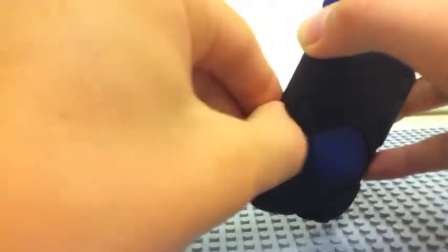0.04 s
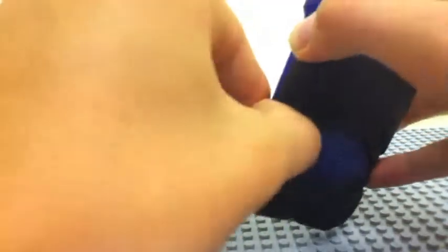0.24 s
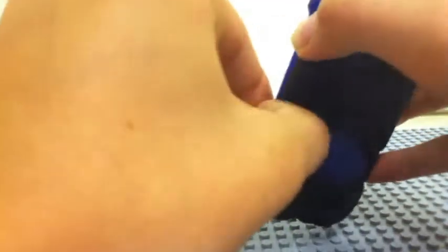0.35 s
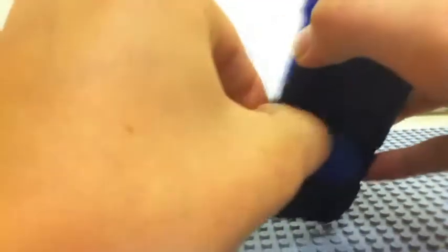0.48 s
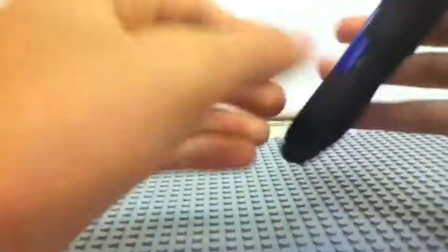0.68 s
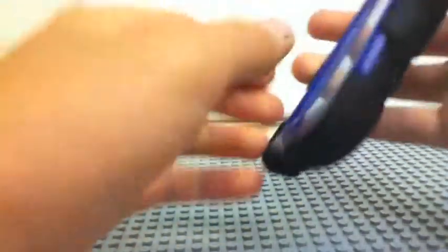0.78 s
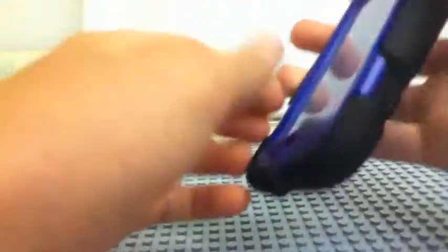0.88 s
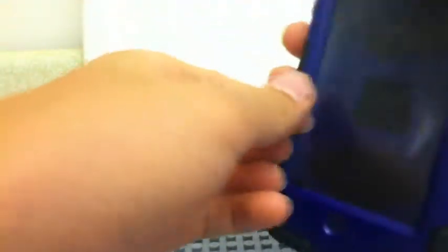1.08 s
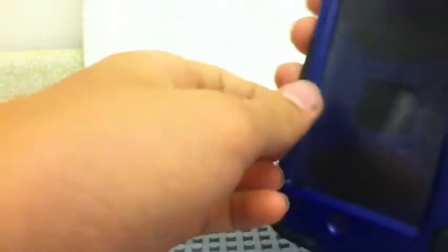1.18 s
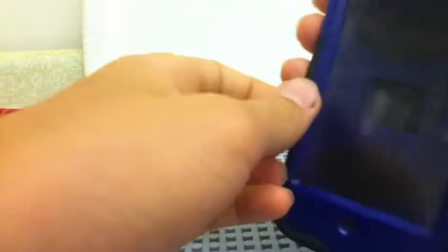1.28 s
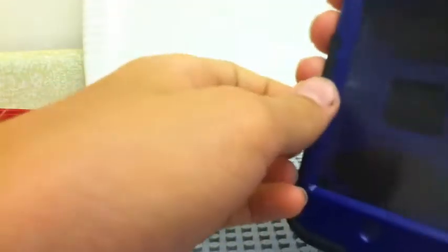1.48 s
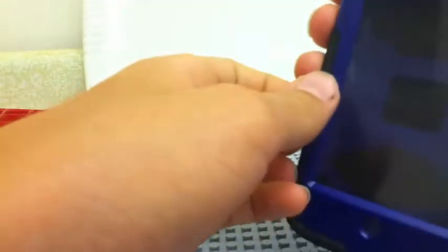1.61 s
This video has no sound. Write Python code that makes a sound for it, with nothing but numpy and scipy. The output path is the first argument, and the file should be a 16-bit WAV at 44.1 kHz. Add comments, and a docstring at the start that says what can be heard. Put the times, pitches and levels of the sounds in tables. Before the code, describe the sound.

Plastic phone case clips snap under prying fingers, heard close in a small quiet room. A short knocking click and scrape open the scene, then the loudest, sharp clustered snap comes at 0.23 seconds. Near-quiet follows until faint rubbing and ticks around 0.6. At 1.09 a crisp click leads into soft uneven scraping, ending with another click near 1.62. Low rumble and faint hiss stay underneath.

```python
"""A small quiet room, with the microphone close to a plastic case that fingers pry apart.
A low rumble of the house and the hiss of the microphone are bands of noise that waver a little.
Fingertips rub along the shell as a rain of tiny slips; clips snap and tick as single blows.
Slips and blows ring in the same short modes of the case; rubbing adds skin hiss, clips a bright crack.
Noise dying away in octave bands is the echo of the room."""
import sys
import numpy as np
from scipy import signal
from scipy.io import wavfile

SR = 44100
rng = np.random.default_rng(int(sys.argv[2]) if len(sys.argv) > 2 else 0)


def materialize(psi):
    """Save the field psi as 16-bit PCM at rate SR to the path in sys.argv[1].

    A 1-D psi becomes a single channel; in a 2-D psi each row is a channel.
    """
    bounded = np.clip(np.atleast_2d(psi).T, -1, 1)
    quanta = np.round(bounded * 32767).astype(np.int16)
    wavfile.write(sys.argv[1], SR, quanta)


N = 72765
THUD_HZ, KNOCK_HZ, CLACK_HZ = 500, 1000, 1400  # upper edges of three low ranges of case modes


def from_db(db):
    """Turn dB into an amplitude gain."""
    return 10 ** (np.asarray(db) / 20)


def rms_one(x):
    """Scale a signal to rms 1."""
    return x / np.sqrt(np.mean(x ** 2) + 1e-20)


def bandpass(x, low_hz, high_hz):
    """Keep what lies between two frequencies."""
    return signal.sosfilt(signal.butter(2, [low_hz, high_hz], "band", fs=SR, output="sos"), x)


def drift(rate_hz):
    """Slow random wander of rms 1: noise through two equal low-pass poles, on every 40th sample."""
    pole = np.exp(-2 * np.pi * rate_hz * 40 / SR)
    noise = rng.standard_normal(N // 40 + 2002)
    slow = signal.lfilter([1], [1, -2 * pole, pole ** 2], noise)[2000:]  # skip the settling
    return np.interp(np.arange(N) / 40, np.arange(len(slow)), rms_one(slow))


def ring(force, pitch_hz, t60_s):
    """One mode as a two-pole resonator: a unit click starts a decaying sine of initial height 1."""
    pole = from_db(-60 / (t60_s * SR))
    angle = 2 * np.pi * pitch_hz / SR
    # the tiny offset keeps the filter out of very slow arithmetic
    return signal.lfilter([0, np.sin(angle)], [1, -2 * pole * np.cos(angle), pole ** 2], force + 1e-18)


# Spectrum of the room and microphone floor, before scaling to FLOOR_DB:
# pitch_hz [Hz], level_db [relative dB per Hz]
FLOOR_SPECTRUM = [(15, -50), (25, -27), (92, 0.5), (317, -15), (363, -19), (394, -15.5), (607, -18.5),
                  (818, -20.5), (1230, -21.5), (1440, -23), (10400, -27.5), (16000, -32)]
FLOOR_DB, FLOOR_PATCHY_DB = -56.5, -0.5  # rms level; size of the wavering


def floor():
    """House rumble and microphone hiss: half-octave bands of noise, each wavering in level."""
    hz, db = np.transpose(FLOOR_SPECTRUM)
    edges = 22 * 2 ** np.arange(0, 9.9, .5)
    white = rng.standard_normal((2, N + SR // 2))  # neighbouring bands take different noise
    out = 0
    for k, (low, high) in enumerate(zip(edges, edges[1:])):
        band = bandpass(white[k % 2], low, high)[-N:]
        band_db = np.interp(np.log(low * high) / 2, np.log(hz), db)
        out = out + band * from_db(band_db + FLOOR_PATCHY_DB * drift(24))
    return from_db(FLOOR_DB) * rms_one(out)


# Modes of the plastic case, rung by rubbing and by clicks alike:
# pitch_hz [Hz], level_db [dB, before the shaping by each stroke or click], t60_s [s to fall 60 dB]
CASE_MODES = [(178, -10.5, 0.057), (265, -19, 0.043), (403, -21, 0.035), (635, -11.5, 0.021),
              (818, -4.5, 0.012), (1021, -18.5, 0.047), (1316, -6, 0.016), (1597, -7, 0.0099),
              (1910, -11.5, 0.011), (2095, -17, 0.029), (2296, -10, 0.0094), (3444, -12, 0.0066),
              (4065, -18.5, 0.01), (5033, -16.5, 0.0072), (6410, -18, 0.0059), (8260, -25.5, 0.0058),
              (10570, -29, .005)]
# Rubbing strokes, each a list of points joined by straight lines:
# start_s [s], level_db [dB, rms of the ringing], tilt_db [dB per octave, held to +-6],
# bass_db [dB extra under KNOCK_HZ], hiss_db [dB, skin hiss relative to level_db]
RUB_STROKES = [
    [(.0145, -74, 9, -11, -7), (.0175, -44, -11.5, -17, -2), (.021, -45.5, 15, -16, -6),
     (.024, -41, 7, -10, 5.5), (.027, -57, 8, -3, -10), (.06, -61.5, 13, 0, -7)],
    [(.575, -66, 2.5, -9, -1.5), (.594, -51.5, -10.5, -8, -12), (.605, -65.5, -1, 6, -10),
     (.619, -53, -2, 4, -6), (.624, -42.5, -1, 5, -16), (.633, -46.5, 3, 6, -13.5),
     (.642, -50, -2.5, -8.5, -6), (.655, -67, 2, -13, -14), (.675, -70, 7, -10, -8)],
    [(.98, -72, 13, -10, -3.5), (1.0, -47.5, 3, 8, -13.5), (1.028, -63, 20, -7, -4),
     (1.038, -53.5, 0.5, -1, -22), (1.056, -48.5, -2, -8, -16), (1.076, -54.5, 10, -5, -25),
     (1.088, -42, 1, -2, -23)],
    [(1.099, -59, 10, -14, -11), (1.103, -37.5, 4, -13, -23), (1.115, -46.5, 5.5, -3, -20),
     (1.129, -49.5, 3.5, -5, -3), (1.147, -43.5, 9, -14, -17), (1.161, -49.5, 1.5, -5, -17),
     (1.173, -60, -18, 5, -8), (1.195, -57, -2, -13, -11), (1.24, -54, 5.5, -10, -16),
     (1.275, -55.5, 5.5, -7, -14), (1.31, -57, 2, -6, -14), (1.352, -52.5, 2, -7, -19),
     (1.362, -55, -1, -7, -12), (1.374, -51, -5, -7, -22), (1.385, -70, 3, -16, -6),
     (1.45, -62.5, -5, 4, -10), (1.5, -59.5, -2.5, -6, -10), (1.56, -79, -21, 12, -8),
     (1.585, -59, 1, -4, -15), (1.605, -54.5, -3.5, -3, -18), (1.617, -44, -0.5, -13, -16),
     (1.622, -43.5, 5.5, -11.5, -36), (1.628, -48.5, 4, 1.5, -22), (1.65, -80, -14, 6, -14)],
]
SLIPS_PER_S, SLIP_SPREAD_DB = 5000, 2.5
SKIN_SOFT_HZ, SKIN_SOFT_DB = 5600, -12  # soft skin drives the modes above this pitch less
RUB_THUD_DB = -8  # rubbing barely moves the lowest modes
HISS_LOW_HZ, HISS_HIGH_HZ = 5560, 11300


def rubbing():
    """Skin sticks and slips thousands of times a second; the tiny slips ring the case and hiss."""
    t = np.arange(N) / SR
    level, tilt, bass_db, hiss_db = np.zeros((4, N))
    for stroke in RUB_STROKES:
        start_s, *columns = np.transpose(stroke)
        on = (t >= start_s[0]) & (t < start_s[-1])
        db, tilt[on], bass_db[on], hiss_db[on] = (np.interp(t[on], start_s, c) for c in columns)
        level[on] = from_db(db)

    slip_now = rng.random(N) < SLIPS_PER_S / SR
    slip_size = from_db(SLIP_SPREAD_DB * np.minimum(rng.exponential(1, N), 5))
    slips = rms_one(slip_now * slip_size)

    gains, power = [], 0
    for hz, mode_db, t60_s in CASE_MODES:
        fixed_db = mode_db + RUB_THUD_DB * (hz < THUD_HZ) + SKIN_SOFT_DB * (hz > SKIN_SOFT_HZ)
        tilt_db = np.clip(tilt, -6, 6) * np.log2(hz / 1000)
        gain = from_db(fixed_db + tilt_db + bass_db * (hz < KNOCK_HZ))
        gains.append(gain)
        power = power + gain ** 2 * t60_s * SR / (4 * np.log(1000))  # energy of the decaying sine

    force = level * slips / np.sqrt(power)  # the summed modes then follow the stroke's level
    ringing = sum(ring(force * gain * rng.standard_normal(N), hz, t60_s)
                  for gain, (hz, _, t60_s) in zip(gains, CASE_MODES))
    hiss = rms_one(bandpass(rng.standard_normal(N), HISS_LOW_HZ, HISS_HIGH_HZ))
    return ringing + level * from_db(hiss_db) * hiss


# Snaps and ticks of the clips: start_s [s], level_db [dB, before mode levels and tilt],
# tilt_db [dB per octave about 1 kHz], thud_db [dB extra under THUD_HZ],
# knock_db [dB extra from THUD_HZ to KNOCK_HZ], clack_db [dB extra from KNOCK_HZ to CLACK_HZ],
# sign [+1 or -1, direction of the push]
CLIP_CLICKS = [(0.0171, -44.5, 10, 9, -17, 8, 1), (0.0239, -25.5, 5, 19.5, -5, -3, 1),
               (0.0276, -29, 1, 12, 10.5, -27, 1), (0.034, -47, 5, 0, -18, -11, 1),
               (.102, -43, -1, -6, 1.5, 1.5, 1), (.2321, -8, 0.5, -18.5, 6, -2, -1),
               (0.2331, -12.5, 0.5, -10, -17, 5.5, 1), (.2347, -8, 3, -7, -0.5, 5, -1),
               (0.237, -16, -2.5, -12, 3.5, 4.5, 1), (0.57, -57, 8.5, -8, -5.5, 0, 1),
               (0.611, -44.5, -3.5, -6.5, -6, 4, 1), (.626, -52.5, 10, 7, -8, -9, 1),
               (0.6369, -36.5, 2, 7, -12, 4.5, 1), (.666, -52, 5, -2, -9, 6, 1),
               (1.0897, -25, 4, -16, -17, -4.5, 1), (1.243, -40.5, 2, 1, -8, -12, 1),
               (1.543, -48.5, -3.5, -2, 0, 0, 1), (1.6235, -23, -0.5, -15, -22, -7, 1)]
STRIKE_SPREAD_DB = 1.5  # chance differences between modes in each click
CRACK_DB, CRACK_T60_S, CRACK_HZ, CRACK_TOP_HZ = -18, 0.0065, 2820, 11200


def clicks():
    """Each click strikes every mode, tilted by its hardness, and adds a short bright crack of noise."""
    start_s, db, tilt, thud_db, knock_db, clack_db, sign = np.transpose(CLIP_CLICKS)
    at = (start_s * SR).astype(int)
    chance = rng.standard_normal((len(at), len(CASE_MODES)))
    ringing = 0
    for k, (hz, mode_db, t60_s) in enumerate(CASE_MODES):
        strike_db = db + mode_db + tilt * np.log2(hz / 1000) + STRIKE_SPREAD_DB * chance[:, k]
        strike_db += thud_db * (hz < THUD_HZ)
        strike_db += knock_db * (THUD_HZ < hz < KNOCK_HZ)
        strike_db += clack_db * (KNOCK_HZ < hz < CLACK_HZ)
        force = np.zeros(N)
        force[at] = (-1) ** k * sign * from_db(strike_db)  # neighbouring modes start opposite
        ringing = ringing + ring(force, hz, t60_s)

    force = np.zeros(N)
    force[at] = from_db(db + CRACK_DB + tilt * np.log2(CRACK_HZ / 1000))
    fade = signal.lfilter([1], [1, -from_db(-60 / (CRACK_T60_S * SR))], force + 1e-18)
    return ringing + bandpass(fade * rng.standard_normal(N), CRACK_HZ, CRACK_TOP_HZ)


# Decay of the small room: pitch_hz [Hz], t60_s [s to fall 60 dB]
ROOM_DECAY = [(150, 0.35), (500, 0.19), (1500, 0.17), (4000, 0.17), (12000, 0.054)]
ROOM_DB, ROOM_DELAY_S = -18, 0.0022  # level of the echo; silence before it starts to rise


def room(x):
    """Dense reflections: octave bands of noise, each dying at its own rate."""
    t = np.arange(SR // 2) / SR
    hz, t60_s = np.transpose(ROOM_DECAY)
    tail = 0
    for low in 62.5 * 2 ** np.arange(8):
        band = bandpass(rng.standard_normal(len(t)), low, 2 * low)
        band_t60_s = np.interp(np.log(low * 1.4), np.log(hz), t60_s)
        tail = tail + band * from_db(-60 * t / band_t60_s)
    tail = tail * np.clip(t / ROOM_DELAY_S - 1, 0, 1)
    return signal.fftconvolve(x, tail / np.sqrt(np.sum(tail ** 2)))[:N]


RADIATES_ABOVE_HZ = 56


def scene():
    """The case close by, which radiates little bass, its echo in the room, and the floor."""
    high_pass = signal.butter(2, RADIATES_ABOVE_HZ, "high", fs=SR, output="sos")
    case = signal.sosfilt(high_pass, rubbing() + clicks())
    return (floor() + case + from_db(ROOM_DB) * room(case))[None]


TOP_STOP_HZ = 16600  # at least 60 dB down from here up


def record(dry):
    """A steep low-pass cuts the top."""
    return signal.sosfilt(signal.cheby2(14, 60, TOP_STOP_HZ, fs=SR, output="sos"), dry)


dry = scene()
out = record(dry)
materialize(out)
```